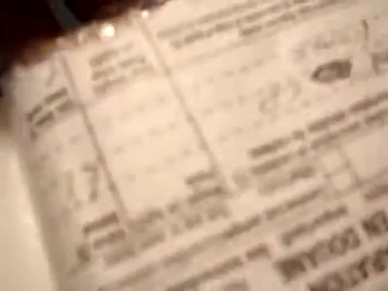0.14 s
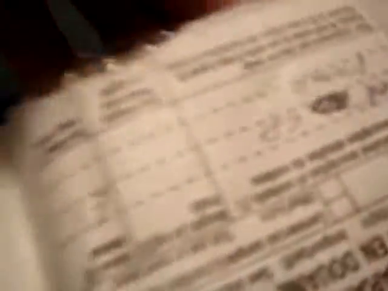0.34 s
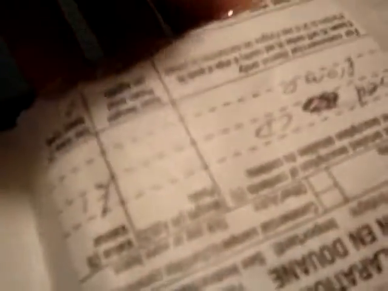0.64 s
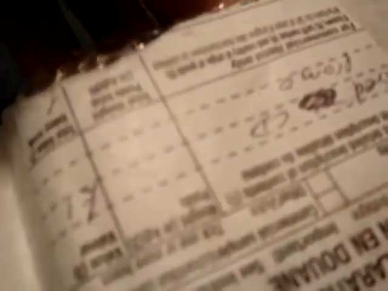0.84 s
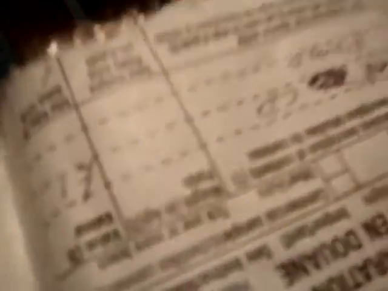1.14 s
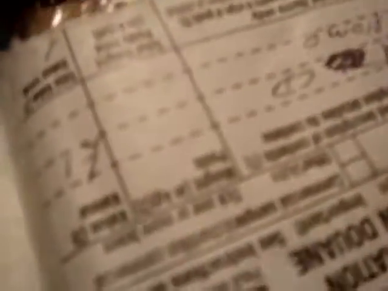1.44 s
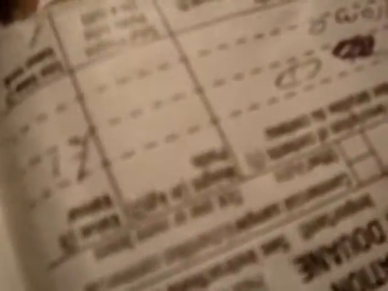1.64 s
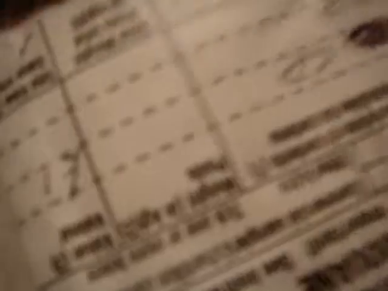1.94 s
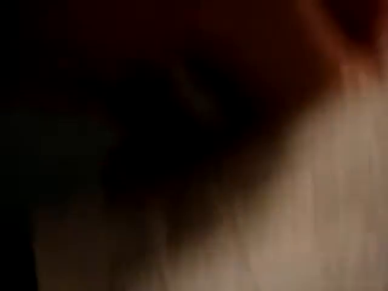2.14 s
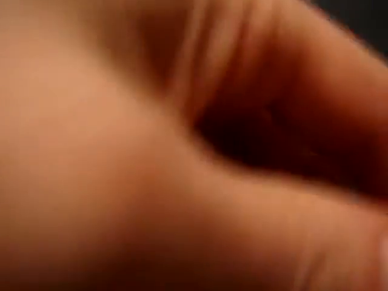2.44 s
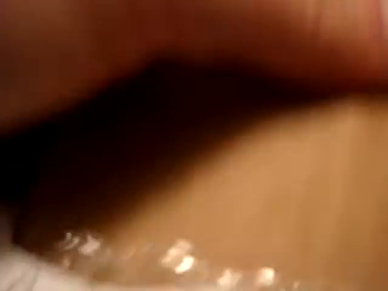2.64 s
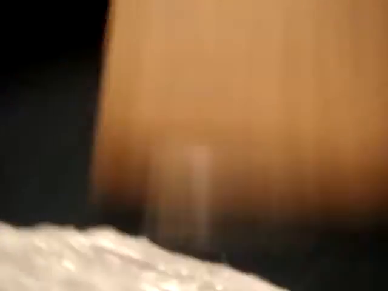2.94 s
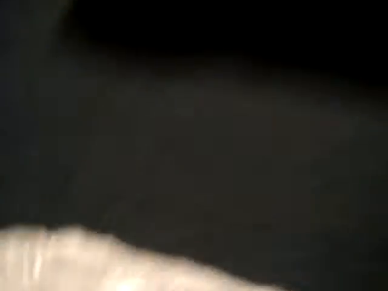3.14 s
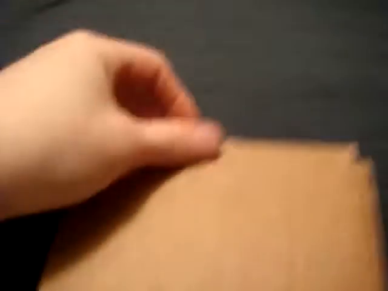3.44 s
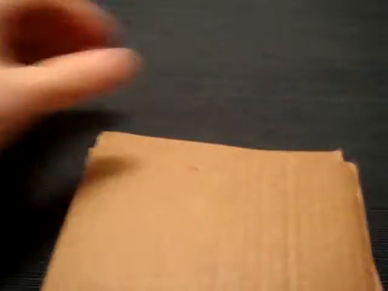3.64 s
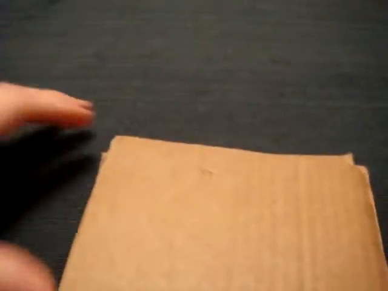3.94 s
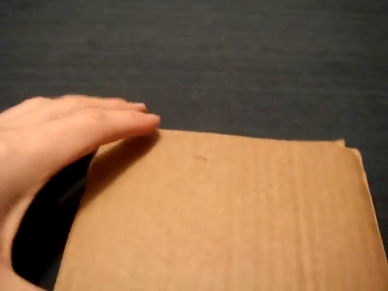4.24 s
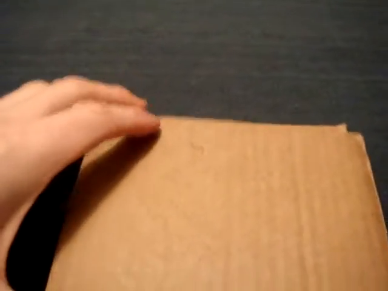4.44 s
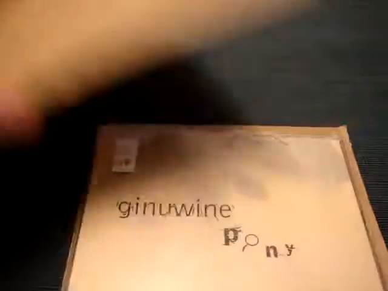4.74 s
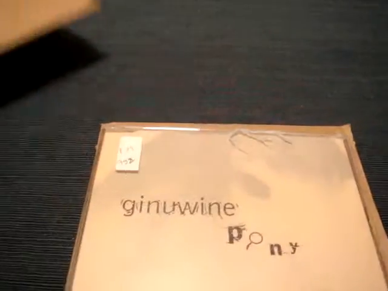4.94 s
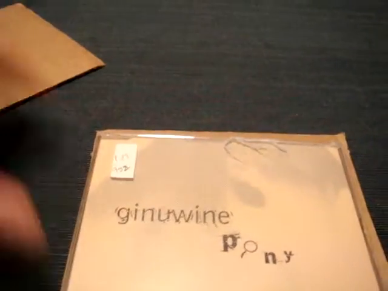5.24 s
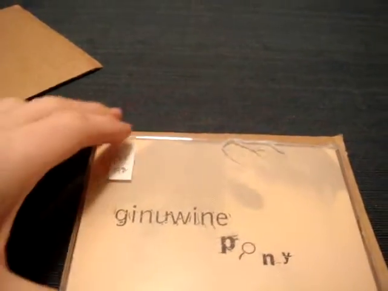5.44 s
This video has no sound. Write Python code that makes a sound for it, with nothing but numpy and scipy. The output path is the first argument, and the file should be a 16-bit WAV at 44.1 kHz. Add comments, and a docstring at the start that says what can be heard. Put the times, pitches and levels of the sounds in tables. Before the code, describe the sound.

Close hands work a padded paper envelope with sharp pops and ticks, pull out a card packet in a rushing scrape, then mostly faint room rush.

```python
"""Opening a padded envelope

Hands work stiff paper close by in a small quiet room: creases jump and ring their panels in sharp snaps,
the flap ticks as small facets buckle, and a packet slides out in a rustle of dense random slips.
Drags excite single resonances, small creases crackle, the desk booms softly as the packet lands,
and its lifted cover squeaks as a wavering, raspy tone. A soft room rush lies beneath."""
import sys
import numpy as np
from scipy import signal
from scipy.fft import rfft, irfft, next_fast_len
from scipy.io import wavfile
from scipy.ndimage import uniform_filter1d

SR = 44100
rng = np.random.default_rng(int(sys.argv[2]) if len(sys.argv) > 2 else 0)


def log_audio(samples):
    """Write samples as a 16-bit WAV file to the path given in sys.argv[1]."""
    # one column per channel
    frames = np.atleast_2d(samples).T
    # limit to full scale, then quantise
    limited = np.clip(frames, -1, 1)
    pcm = np.round(limited * 32767).astype(np.int16)
    wavfile.write(sys.argv[1], SR, pcm)


N = 245625
TIME_S = np.arange(N) / SR

# Buckles and knocks. Each row: start in seconds, ring level in dB, ring frequency in Hz, crack level in dB,
# crack low-pass in Hz, crumple time in seconds (folding peaks at half of it), thump level in dB,
# thump low-pass in Hz. Levels spread the energy over 10 ms.
SNAP_EVENTS = [ (0.293, -33.5, 690, -32.5, 2200, 0.0024, -75, 600),
               (0.4085, -18.5, 680, -26, 1000, 0.0057, -66, 600),
               (0.5041, -20.5, 434, -19, 8000, 0.0026, -32.5, 600),
               (.505, -28, 253.5, -40, 3000, 0.0068, -49, 600),
               (.5080, -19, 736, -14.5, 12000, 0.0071, -29.5, 150),
               (0.518, -26.5, 685, -33, 4000, 0.0071, -35.5, 100),
               (0.880, -38, 630, -46, 1500, 0.0019, -53, 600),
               (0.931, -35.5, 622, -48, 1500, 0.0023, -61, 600),
               (0.981, -29, 1164, -23, 2500, 0.011, -43, 300),
               (.988, -27, 577, -28.5, 2000, 0.0065, -58, 600),
               (1.0875, -34, 648, -45, 1500, 0.0032, -58, 600),
               (1.114, -33.5, 1123, -33.5, 2500, 0.003, -44, 600),
               (1.127, -38, 790, -35.5, 3500, 0.0024, -51, 600),
               (1.237, -27, 1130, -30.5, 900, 0.00057, -49, 900),
               (1.371, -42.5, 452, -44, 2500, 0.0032, -41, 600),
               (1.4514, -18.5, 1420, -18.5, 12000, 0.001, -43, 150),
               (1.4902, -18, 1487, -17, 8900, 0.0014, -32, 400),
               (1.496, -31, 690, -36, 8000, 0.0046, -58, 600),
               (1.545, -28.5, 424, -33.5, 1200, 0.00066, -36, 400),
               (2.0307, -14.5, 1657, -18, 5000, 0.001, -36, 200),
               (2.0516, -31, 860, -25.5, 3000, 0.0022, -39, 200),
               (2.1649, -28, 754, -16.5, 10100, 0.0019, -43, 90),
               (2.282, -23, 1970, -26.5, 4950, 0.00056, -72, 600),
               (2.3115, -24.5, 2050, -23, 12000, 0.00067, -46, 90),
               (2.967, -30, 302, -20, 4000, 0.014, -66, 600),
               (3.207, -42, 280, -35, 4000, 0.0089, -36.5, 300),
               (3.231, -39, 225, -60, 1500, 0.028, -43, 200),
               (3.3835, -31.5, 920, -31.5, 3000, 0.003, -35.5, 1000),
               (3.524, -39.5, 1410, -40, 3500, 0.002, -48, 400),
               (3.584, -35, 1340, -27, 2500, 0.0048, -61, 600),
               (3.5899, -25, 1094, -18.5, 7100, 0.0039, -37, 1200),
               (3.603, -31.5, 1350, -34, 3000, 0.0078, -53, 600),
               (4.642, -48, 1043, -42, 1800, 0.0087, -64, 600)]
# Modes of a buckling panel. Each row: multiple of the ring frequency, relative level in dB, multiple of the ring t60.
PANEL_MODES = [(0.442, -28.5, 2.5), (0.692, -5, 3.2), (1.002, 12.5, 0.79), (1.547, -0.5, 2.5),
               (2.127, -2, 2.1), (2.9, -7, 1.1)]
# Clear ticks of flap and padding. Each row: start in seconds, level in dB before the common tick gain, ring in Hz.
TICK_EVENTS = [(.005, -23, 7800), (.0095, -26, 5230), (.016, -29, 2870), (.1357, -24.5, 4550),
               (.1566, -21.5, 3200), (.1951, -24, 7700), (.2265, -27, 5260), (.2454, -28, 2720),
               (.3702, -29.5, 8700), (.3781, -30, 2200), (.3821, -33, 4550), (.4435, -27, 7000),
               (.456, -28, 6600), (.6445, -32, 7360), (.6805, -40, 6300), (.7807, -41, 2520),
               (.8181, -38, 3100), (.8925, -31.5, 3500), (1.1599, -24, 5350), (1.1688, -23.5, 4000),
               (1.178, -23, 5040), (1.1813, -24, 7150), (1.2267, -21, 6270), (1.2467, -26, 3500),
               (1.2728, -25.5, 5100), (1.3195, -28.5, 2500), (1.3472, -22.5, 6700), (1.3529, -25, 6200),
               (1.3817, -22, 4000), (1.7231, -29, 6400), (1.741, -26.5, 2520), (1.7989, -40, 2900),
               (1.8114, -26, 4950), (1.8184, -34, 5200), (1.8358, -36, 3200), (1.8762, -22.5, 4900),
               (1.9216, -20, 3220), (1.9632, -21, 3670), (1.9855, -19, 4200), (2.005, -13, 1860),
               (2.0653, -16, 2850), (2.0838, -14, 1700), (2.2645, -15, 2090), (2.5138, -31, 3650),
               (3.0536, -25, 3100), (3.1653, -30, 5950), (3.1858, -26.5, 2960), (3.2696, -33, 3670),
               (3.5729, -25, 1700)]
# Drags of fingers and card. Each row: middle in seconds, Gaussian half length (one sigma) in seconds,
# resonance in Hz, ring t60 in seconds, rms level over the touch in dB.
DRAG_EVENTS = [ (0.095, 0.02, 810, 0.014, -30.5), (0.14, 0.0091, 720, 0.013, -33.5),
               (0.493, 0.0027, 645, 0.02, -26), (1.237, 0.0028, 1790, 0.0057, -24.5),
               (1.488, 0.021, 1740, 0.0054, -29.5), (1.670, 0.0074, 1084, 0.049, -36.5),
               (2.028, 0.012, 2350, 0.022, -25), (2.219, 0.0033, 854, 0.016, -26),
               (2.955, .013, 1100, 0.0068, -23), (3.48, 0.014, 1610, 0.011, -38),
               (3.503, 0.011, 1150, .012, -43.5), (3.555, 0.0063, 1500, 0.0088, -39.5)]
# Hand strokes over paper and card. Each row: start in seconds, length in seconds, rubbing level in dB,
# brightness (crinkle over rubbing) in dB.
HAND_STROKES = [ (0.0, 0.15, -46, 3), (0.057, 0.083, -42, -21), (0.408, 0.08, -43.5, -1.5),
                (0.494, 0.12, -42.5, -4), (0.606, 0.11, -47, -15), (0.842, .29, -48.5, -13),
                (1.397, 0.11, -39.5, -10), (1.481, 0.23, -38.5, -6), (1.865, 0.064, -41.5, -5),
                (2.1, 0.55, -43.5, 2.5), (1.891, 0.052, -34, 1), (1.977, 0.095, -31, -3),
                (2.075, 0.023, -30.5, 1), (2.117, 0.243, -35, 2.5), (2.217, 0.062, -34.5, 4),
                (2.368, 0.097, -35.5, 1.5), (2.539, 0.036, -39, 3.5), (2.627, 0.063, -35, -2),
                (2.661, 0.21, -33, 5), (2.762, .11, -29, -6), (2.871, 0.16, -32, 1.5),
                (2.932, 0.079, -25, -2), (3.013, 0.2, -43, 0), (3.359, 0.13, -43.5, 1),
                (3.502, 0.048, -43.5, -4), (3.589, 0.073, -46, -8), (4.4, 0.072, -54, 3),
                (4.481, 0.23, -56.5, -0.5), (5.12, 0.058, -59.5, 10), (5.41, 0.078, -62.5, 9.5)]
# Desk-top modes under the landing packet. Each row: start in seconds, frequency in Hz, t60 in seconds, level in dB.
DESK_MODES = [(3.586, 94, .22, -46), (3.586, 124, .14, -44)]
# Squeak of the cover on the packet. Each row: time in seconds, pitch in Hz, tone level in dB before flutter.
SQUEAK_PATH = [(4.518, 2790, -70), (4.531, 2695, -52), (4.541, 2645, -53), (4.553, 2710, -49),
               (4.566, 2800, -56), (4.59, 2800, -64)]
# Ring of the freed card. Each row: start in seconds, frequency in Hz, t60 in seconds, level in dB.
CARD_MODES = [(4.646, 3360, .03, -47), (4.646, 2230, .03, -53)]

# Spectrum outlines. Each row: frequency in Hz, relative gain in dB.
# Snap crack of a crease.
CRACK_COLOUR = [(40, -48), (300, -29.5), (600, 3), (1000, 6), (1500, 6), (2200, 4.5), (3200, 3.5),
                (5000, -0.5), (6800, -0.5), (10000, -10.5)]
# Air push of a snap.
THUMP_COLOUR = [(20, -9), (60, -5.5), (130, 4), (260, 9), (450, 12.5), (1200, -5)]
# Click and grit of a tick.
TICK_COLOUR = [(40, -40), (200, -36), (800, -0.5), (2000, -7.5), (4000, -1.5), (7000, 1.5), (10000, -4.5)]
# Low flexing of the sheet.
FLEX_COLOUR = [(25, -39), (70, -17), (130, 1), (300, 6), (430, 9.5), (600, 5.5), (1200, -28.5)]
# Rubbing and scraping of paper.
RUB_COLOUR = [(40, -47), (200, -24), (450, -6.5), (620, 2), (780, 4.5), (1150, 3), (1600, 1), (2300, 0),
              (3200, -2.5), (5000, -19), (10000, -56.5)]
# Bright crinkle of paper.
CRINKLE_COLOUR = [(40, -62), (600, -51.5), (1600, -0.5), (3000, 1.5), (4200, 1.5), (5200, 3.5),
                  (6800, -0.5), (8800, -3.5), (10000, -9.5)]
# Rush of the room.
ROOM_COLOUR = [(18, -61), (30, -31), (195, -18), (243, -5), (358, -6), (424, -16), (479, -6), (626, -13),
               (859, -7), (994, -12), (1470, -11), (2970, -23), (6300, -24), (10000, -29), (13000, -59),
               (22000, -120)]

STROKE_ATTACK_S, STROKE_RELEASE_TAU_S = 0.017, 0.0074
# between strokes the hands grip the envelope until they let it go
GRIP_DB, GRIP_BRIGHT_DB, LET_GO_S, LET_GO_FADE_S = -47, -19.5, 3.16, 0.32
# the packet resting under a hand barely stirs
REST_DB, REST_CRINKLE_DB = -71.5, -62.5
# bent paper slips seldom, sliding paper often
BENT_SLIPS_PER_S, SLIDING_SLIPS_PER_S, SLIDING_POWER = 450, 4500, 4.0
# uneven finger pressure and patchy crinkle of the gripped paper: wander rate and spread
PRESS_PER_S, PRESS_DB, PATCH_PER_S, PATCH_DB = 40, 1, 10, 1
# flexing at the effort of a firm stroke; grows as a power of effort
FIRM_DB, FLEX_DB, FLEX_POWER = -30.5, -47, 0.39
# ring frequency x ring t60, before each mode's multiple
RING_CYCLES = 13.4
# creases pop more softly once the smooth packet slides
PACKET_SLIDES_S, PACKET_CRACKLE_DB = 2, -6.5
# random faint ticks while the flap is worked loose; level before the common tick gain
FLAP_END_S, FAINT_TICK_DB, FAINT_TICK_RANGE_DB = 1.9, -35, 0.5
FAINT_TICK_HZ, FAINT_TICK_OCTAVES = 3690, 0.9
ROOM_TONE_DB = -50
MIC_TOP_HZ, MIC_CLIP = 10120, 0.68


def snaps(follow=0.85, follow_per_s=6000, jolt=0.73, size=8192):
    """A crease jumps once, then in a short run; the panel beside it rings and pushes air."""
    out = np.zeros(N)
    t = TIME_S[:size]
    air_push = colour(signal.unit_impulse(size), THUMP_COLOUR)
    for start_s, ring_db, ring_hz, crack_db, crack_hz, crumple_s, thump_db, thump_hz in SNAP_EVENTS:
        ring_t60_s = RING_CYCLES / ring_hz
        # folding gathers speed, then runs out
        folding = (2 * t / crumple_s) ** 2 * np.exp(2 - 4 * t / crumple_s)
        happens = rng.random(size) < follow_per_s / SR
        jumps = follow * rng.standard_normal(size) * happens * folding
        jumps[0] = 1
        # folding drives each mode, jumps jolt it
        ring = np.zeros(size)
        for multiple, mode_db, t60_multiple in PANEL_MODES:
            hz = multiple * ring_hz
            drive = unit(folding * np.cos(2 * np.pi * hz * t)) + jolt * unit(jumps)
            response = signal.fftconvolve(drive, mode(hz, t60_multiple * ring_t60_s))[:size]
            ring += burst(response, mode_db)
        # slow, padded folds lose their treble
        crack = burst(soften(colour(jumps, CRACK_COLOUR), crack_hz), crack_db)
        thump = burst(soften(air_push, thump_hz, order=2), thump_db)
        add(out, start_s, burst(ring, ring_db) + bend(crack + thump, lag_s=0.000957))
    return out


def rustle(effort, crinkling, slips_per_s, rub_spread_db=3.0, crinkle_spread_db=4.5, shared=0.38,
           facet_share=0.34):
    """Paper catches and slips; each slip stirs the sheet and sheds a bright crinkle."""
    firmness = effort / undb(FIRM_DB)
    fine = slips(slips_per_s, crinkle_spread_db)
    coarse = slips(2 * slips_per_s, rub_spread_db) + shared * fine
    # facets of different size crackle independently
    facets = np.zeros(N)
    for hz in (2770, 4050, 6880, 8630):
        facet_slips = slips(slips_per_s / 4, crinkle_spread_db)
        facets += unit(signal.fftconvolve(facet_slips, mode(hz, 0.0024))[:N])
    flex = unit(colour(slips(2 * slips_per_s, rub_spread_db), FLEX_COLOUR))
    flex *= undb(FLEX_DB) * firmness ** FLEX_POWER
    rub = unit(colour(coarse, RUB_COLOUR)) * effort
    crinkle = unit(colour(fine + facet_share * facets, CRINKLE_COLOUR)) * crinkling
    return bend(flex + rub + crinkle)


def handling():
    """Rubbing effort, crinkle strength and slips per second; grip, rest and strokes add in power."""
    grip = undb(GRIP_DB) * np.clip(1 - (TIME_S - LET_GO_S) / LET_GO_FADE_S, 0, 1)
    grip_crinkle = grip * undb(GRIP_BRIGHT_DB + PATCH_DB * walk(PATCH_PER_S))
    rub_power = grip ** 2 + undb(REST_DB) ** 2
    crinkle_power = grip_crinkle ** 2 + undb(REST_CRINKLE_DB) ** 2
    for start_s, length_s, rub_db, bright_db in HAND_STROKES:
        power = (undb(rub_db) * stroke(start_s, length_s)) ** 2
        rub_power += power
        crinkle_power += power * undb(bright_db) ** 2
    sliding = (1 - grip ** 2 / rub_power) ** SLIDING_POWER
    slips_per_s = BENT_SLIPS_PER_S * (1 - sliding) + SLIDING_SLIPS_PER_S * sliding
    press = undb(PRESS_DB * walk(PRESS_PER_S))
    return press * np.sqrt(rub_power), press * np.sqrt(crinkle_power), slips_per_s


def stroke(start_s, length_s):
    """A hand gathers speed, keeps it for the stroke and stops."""
    attack = np.interp(TIME_S, [start_s, start_s + STROKE_ATTACK_S], [0, 1])
    return attack * np.exp(-np.maximum(TIME_S - start_s - length_s, 0) / STROKE_RELEASE_TAU_S)


def ticks(gain_db=-15.0, ring_db=-2, rattle_db=4, ring_cycles=26, edge_multiple=1.6, size=1024):
    """Tiny single buckles ring their own facets; larger facets sound lower and duller."""
    out = np.zeros(N)
    t = TIME_S[:size]
    rise = 1 - fade(t, 0.003)
    click = unit(colour(signal.unit_impulse(size), TICK_COLOUR))
    grit = colour(rng.standard_normal(N), TICK_COLOUR)
    for start_s, level_db, hz in list(TICK_EVENTS) + faint_ticks():
        rattle = grit[int(start_s * SR):][:size] * rise * fade(t, 0.013)
        crack = soften(click + undb(rattle_db) * unit(rattle), edge_multiple * hz, order=2)
        facet = mode(hz, ring_cycles / hz, size=size) * rise
        add(out, start_s, burst(unit(crack) + undb(ring_db) * unit(facet), level_db + gain_db))
    return bend(out)


def faint_ticks(count=44):
    """Small flap creases tick at random: rows as in TICK_EVENTS."""
    rows = []
    for when, strength, pitch in rng.random((count, 3)):
        level_db = FAINT_TICK_DB + FAINT_TICK_RANGE_DB * (2 * strength - 1)
        hz = FAINT_TICK_HZ * 2 ** (FAINT_TICK_OCTAVES * (2 * pitch - 1))
        rows.append((FLAP_END_S * when, level_db, hz))
    return rows


def drags(scrape_db=-5, size=16384):
    """Stick-slip of fingertip or card edge excites one envelope resonance over a papery scrape."""
    out = np.zeros(N)
    chatter = colour(slips(2500, 6.5), [(40, -33), (600, -8.0), (10000, -6.0)])
    scrape = colour(chatter, RUB_COLOUR)
    for middle_s, half_s, hz, t60_s, level_db in DRAG_EVENTS:
        start_s = max(middle_s - size / 2 / SR, 0)
        span = slice(int(start_s * SR), int(start_s * SR) + size)
        touch = np.exp(-((TIME_S[span] - middle_s) / half_s) ** 2 / 2)
        ring = signal.fftconvolve(chatter[span] * touch, mode(hz, t60_s))[:size]
        voice = unit(ring) + undb(scrape_db) * unit(scrape[span] * touch)
        gain = undb(level_db) * np.sqrt(np.sum(touch ** 2) / np.sum(voice ** 2))
        add(out, start_s, voice * gain)
    return out


def crackles(effort, per_second=70, centre_hz=1900, octaves_each_way=2.0, ring_cycles=11, below_db=-10,
             spread_db=6.5, count=900, size=1024):
    """Small creases pop at random while paper is worked, each at its own pitch."""
    out = np.zeros(N)
    effort_db = 20 * np.log10(effort) + PACKET_CRACKLE_DB * (TIME_S > PACKET_SLIDES_S)
    gaps, pitches, sizes = rng.random((count, 3)).T
    starts_s = np.cumsum(-np.log(1 - gaps)) / per_second
    for start_s, pitch, chance in zip(starts_s, pitches, sizes):
        if start_s < TIME_S[-1]:
            hz = min(centre_hz * 2 ** (octaves_each_way * (2 * pitch - 1)), SR / 5)
            extra_db = spread_db * min(-np.log(1 - chance), 2)
            level_db = effort_db[int(start_s * SR)] + below_db + extra_db
            add(out, start_s, burst(mode(hz, ring_cycles / hz, size=size), level_db))
    return colour(out, [(40, -51), (500, -6.0), (3000, -8.0), (10000, 7.5)])


def cover(waver=0.025, flutter_db=3, rasp_db=-4):
    """Card sticks and slips on card in a thin, raspy squeak, then comes free and rings."""
    knots_s, knots_hz, knots_db = np.transpose(SQUEAK_PATH)
    pitch_hz = np.interp(TIME_S, knots_s, knots_hz) * (1 + waver * walk(700))
    level = np.interp(TIME_S, knots_s, undb(knots_db), left=0, right=0) * undb(flutter_db * walk(300))
    rasp_colour = [(800, -30), (2500, -4), (4900, 0), (6500, -16), (10000, -25)]
    rasp = unit(colour(slips(2500, 3), rasp_colour))
    tone = np.sqrt(2) * np.sin(2 * np.pi * np.cumsum(pitch_hz) / SR)
    out = level * (tone + undb(rasp_db) * rasp)
    for start_s, hz, t60_s, level_db in CARD_MODES:
        add(out, start_s, burst(mode(hz, t60_s), level_db))
    return out


def desk():
    """Desk-top modes swell and boom faintly as the packet lands."""
    out = np.zeros(N)
    for start_s, hz, t60_s, level_db in DESK_MODES:
        boom = mode(hz, t60_s)
        soft_landing = (1 - fade(TIME_S[:len(boom)], 0.06)) ** 2
        add(out, start_s, burst(boom * soft_landing, level_db))
    return out


def room(x, wet_db=-15, t60_s=0.031, gap_s=0.003, treble_db=-7, size=16384):
    """Short, slightly dull reflections from desk and walls: decaying noise after a gap."""
    t = TIME_S[:size]
    tail = rng.standard_normal(size) * fade(t, t60_s) * (t > gap_s)
    tail = colour(tail, [(100, -16.5), (1500, 0.5), (9000, treble_db)])
    return x + undb(wet_db) * signal.fftconvolve(x, tail / np.sqrt(np.sum(tail ** 2)))[:N]


def room_tone():
    """Steady soft rush of the room with a little hiss: coloured noise."""
    return unit(colour(rng.standard_normal(N), ROOM_COLOUR)) * undb(ROOM_TONE_DB)


def bend(x, lag_s=0.00068):
    """Dispersive bending waves in paper: treble arrives first, delay is lag_s / sqrt(kHz + 0.2)."""
    size = next_fast_len(len(x) + 2048)
    khz = np.arange(size // 2 + 1) * SR / size / 1000
    turns = 2 * lag_s * 1000 * (np.sqrt(khz + 0.2) - np.sqrt(0.2))
    return irfft(rfft(x, size) * np.exp(-2j * np.pi * turns), size)[:len(x)]


def slips(per_second, spread_db):
    """Random clicks of uneven size and either sign, mean power 1."""
    chance = np.clip(per_second / SR, 0, 1)
    sizes = undb(spread_db * np.minimum(rng.exponential(size=N), 4))
    happens = rng.random(N) < chance
    signs = rng.choice([-1, 1], N)
    # dividing by sqrt(chance) keeps power even as the rate varies
    return unit(happens * signs * sizes / np.sqrt(chance))


def mode(hz, t60_s, size=8192):
    """Ring of one damped resonance."""
    t = TIME_S[:size]
    return np.sin(2 * np.pi * hz * t) * fade(t, t60_s)


def fade(t, t60_s):
    """Exponential decay, 60 dB in t60_s."""
    return np.exp(-np.log(1000) * t / t60_s)


def walk(per_second):
    """Smooth random wander with a spread near 1."""
    step = int(SR / per_second)
    held = np.repeat(rng.standard_normal(N // step + 1), step)
    return uniform_filter1d(held, step)[:N]


def colour(x, points, size=4096):
    """Causal minimum-phase filter with the given (Hz, dB) outline."""
    hz, db = np.transpose(points)
    bins_hz = np.maximum(np.arange(size // 2 + 1) * SR / size, 1)
    outline_db = np.interp(np.log(bins_hz), np.log(hz), db)
    # fold the cepstrum to its causal half
    cepstrum = irfft(np.log(undb(outline_db)))
    cepstrum[1:size // 2] *= 2
    cepstrum[size // 2 + 1:] = 0
    return signal.fftconvolve(x, irfft(np.exp(rfft(cepstrum))))[:len(x)]


def soften(x, hz, order=1):
    """Gentle low-pass."""
    return signal.lfilter(*signal.butter(order, min(hz, SR / 3), fs=SR), x)


def undb(db):
    """Decibels to gain."""
    return 10 ** (np.asarray(db) / 20)


def unit(x):
    """Scale to rms 1."""
    return x / np.sqrt(np.mean(x ** 2))


def burst(x, db):
    """Scale a short sound to the energy of 10 ms at this rms level."""
    return x * undb(db) * np.sqrt(0.01 * SR / np.sum(x ** 2))


def add(out, start_s, x):
    """Mix in a short sound at start_s."""
    start = int(start_s * SR)
    out[start:start + len(x)] += x[:len(out) - start]


def scene():
    """All handling in the room over the room tone, one channel."""
    effort, crinkling, slips_per_s = handling()
    paper = snaps() + rustle(effort, crinkling, slips_per_s) + ticks() + drags() + crackles(effort)
    return (room(paper + cover() + desk()) + room_tone())[None]


def record(dry):
    """Narrow-band microphone: steep low-pass, hard clip of the peaks, low-pass again both ways."""
    low_pass = signal.ellip(12, 0.1, 70, MIC_TOP_HZ, fs=SR, output="sos")
    clipped = np.clip(signal.sosfilt(low_pass, dry), -MIC_CLIP, MIC_CLIP)
    return signal.sosfiltfilt(low_pass, clipped)


dry = scene()
out = record(dry)
log_audio(out)
```